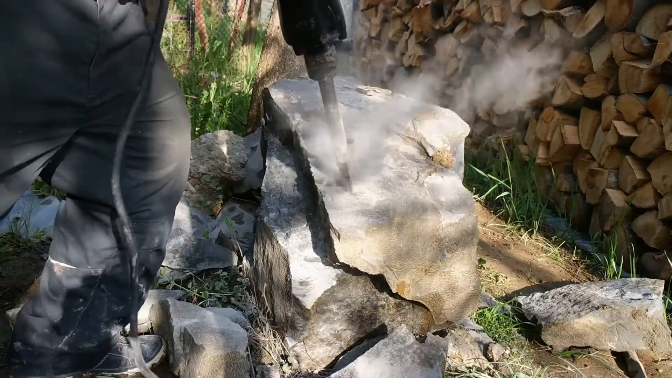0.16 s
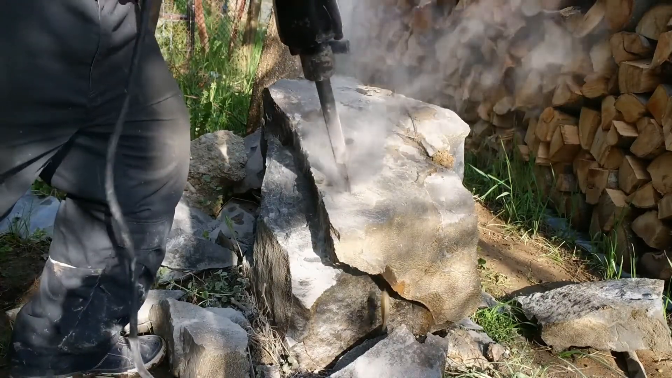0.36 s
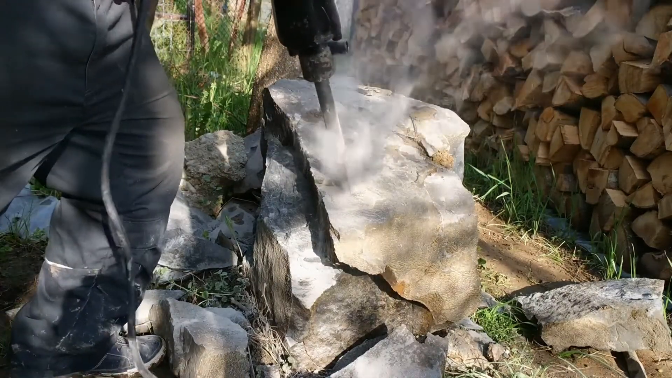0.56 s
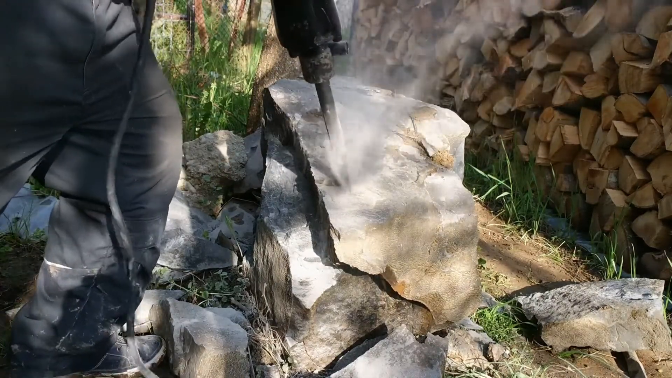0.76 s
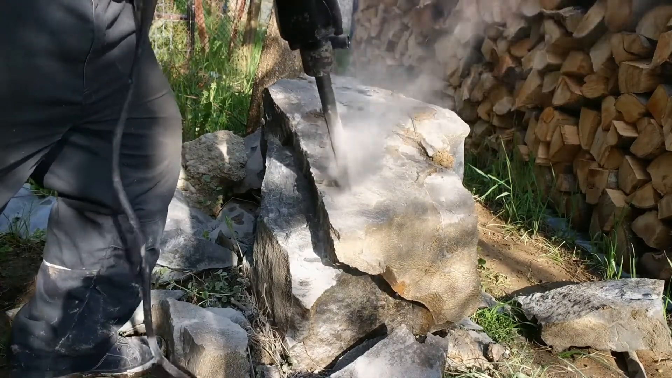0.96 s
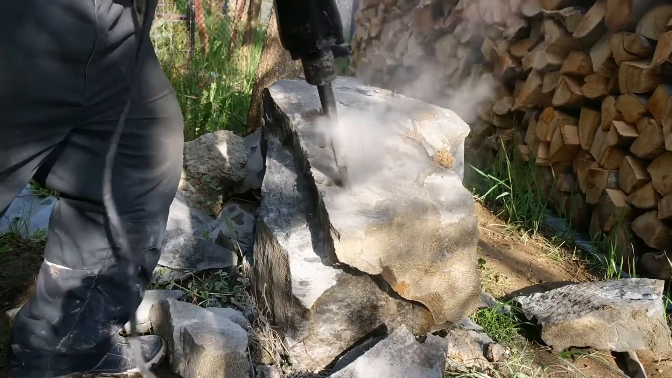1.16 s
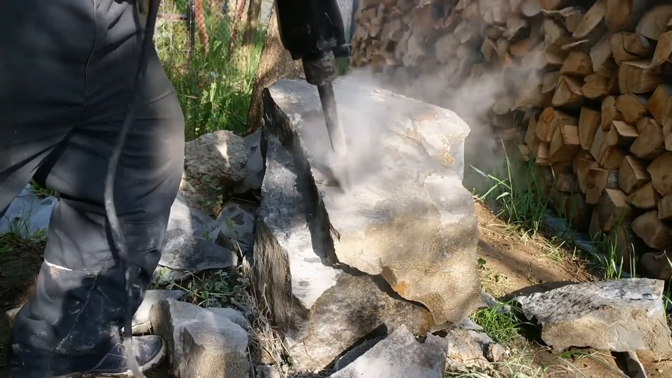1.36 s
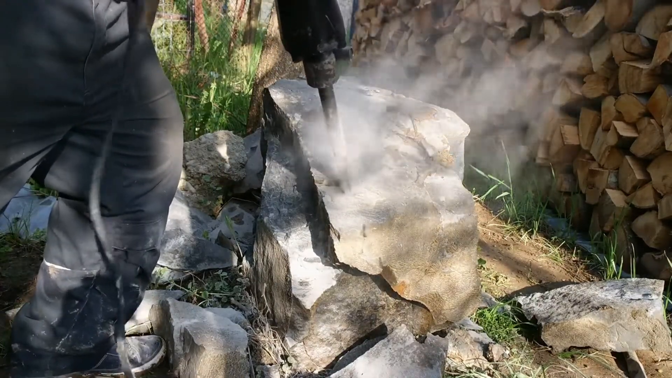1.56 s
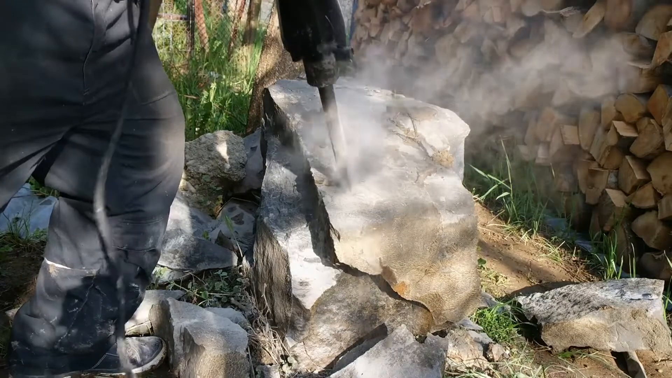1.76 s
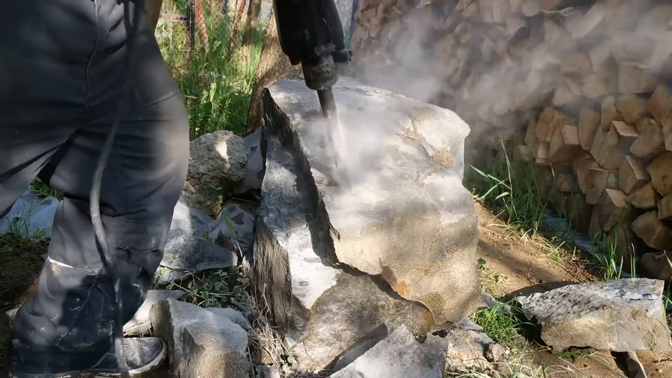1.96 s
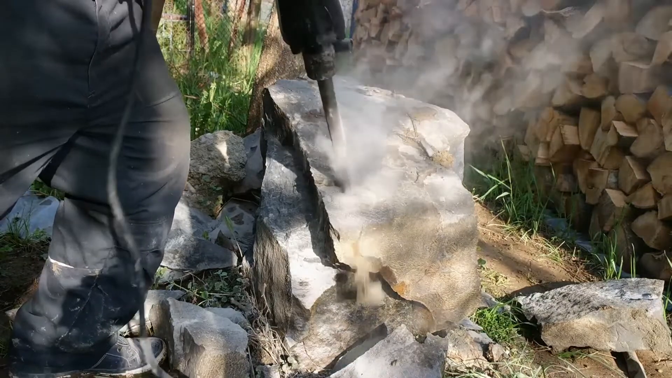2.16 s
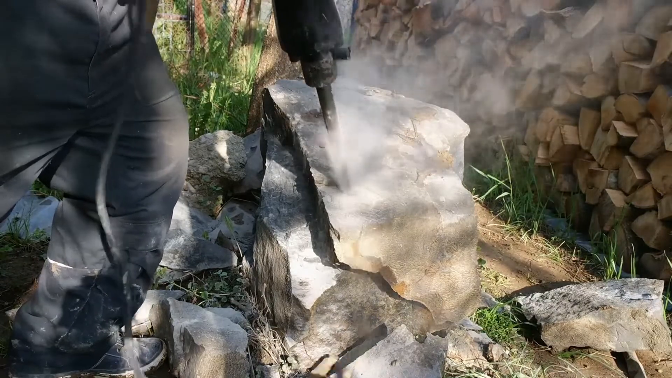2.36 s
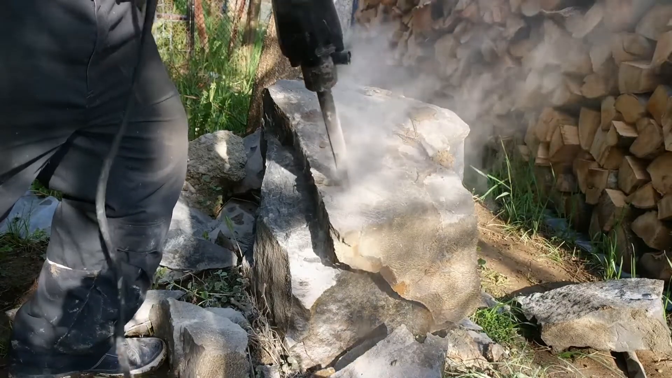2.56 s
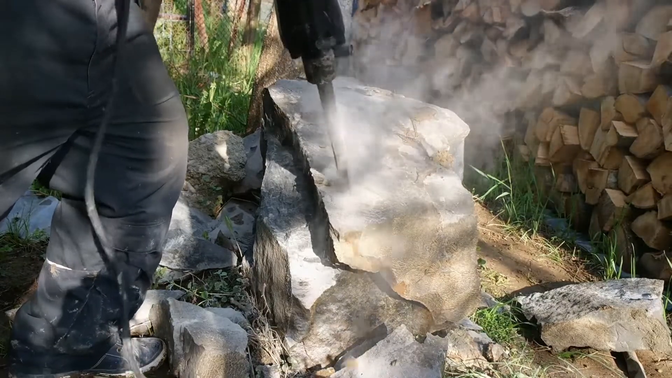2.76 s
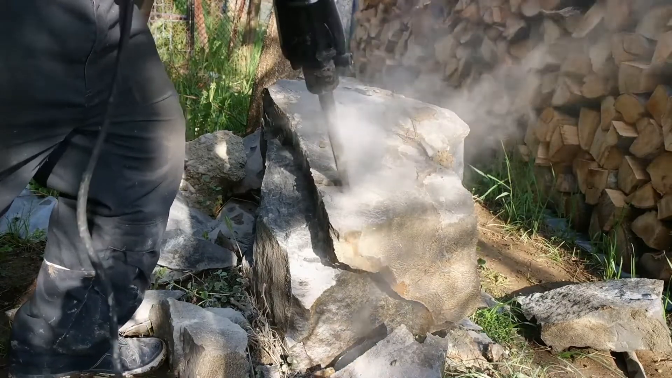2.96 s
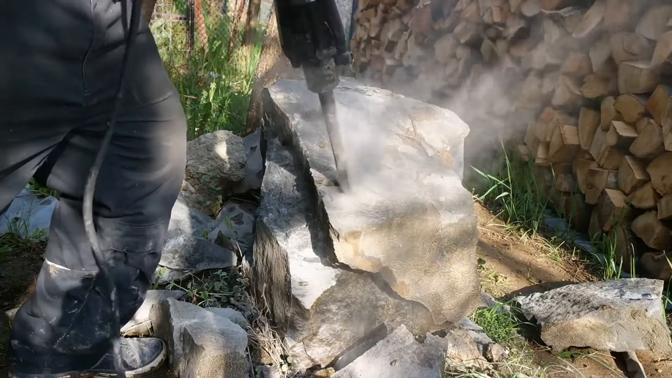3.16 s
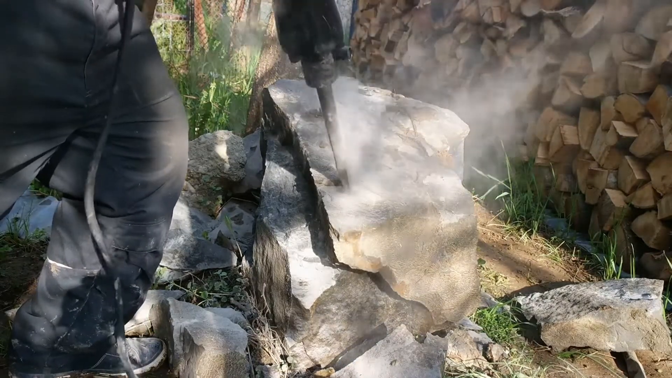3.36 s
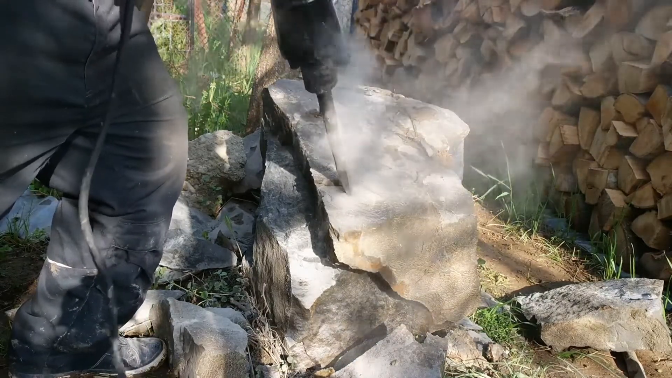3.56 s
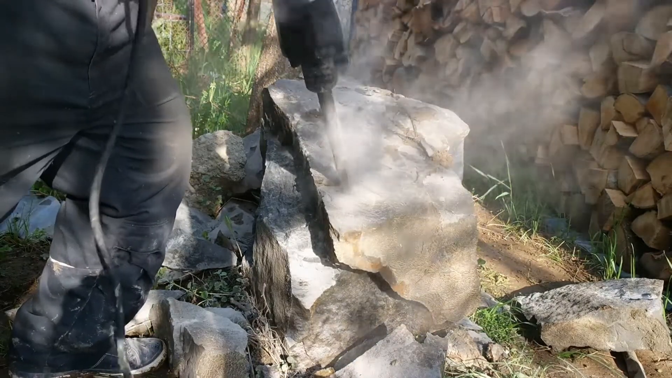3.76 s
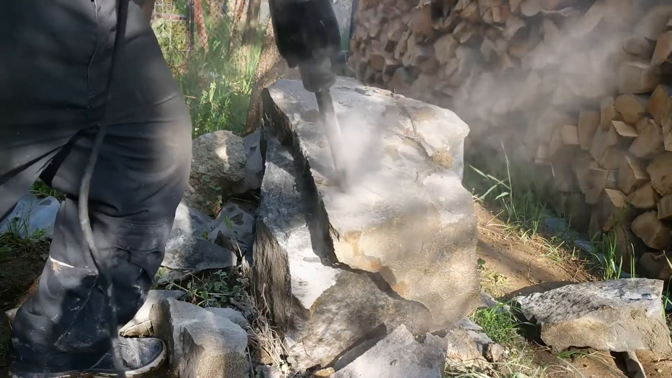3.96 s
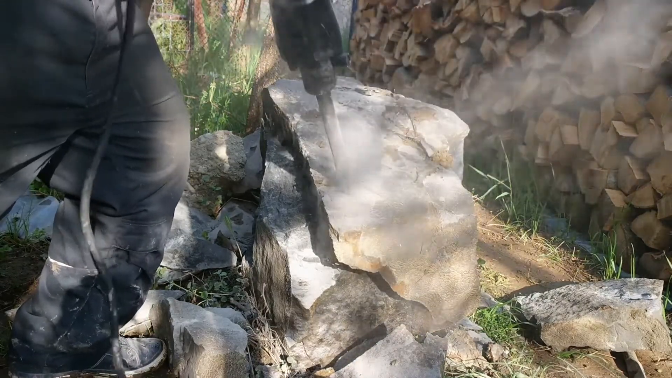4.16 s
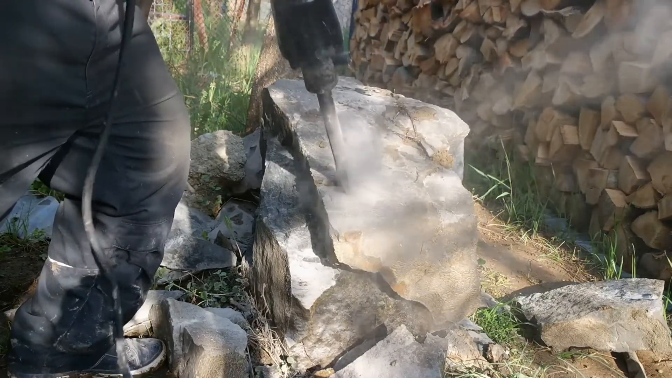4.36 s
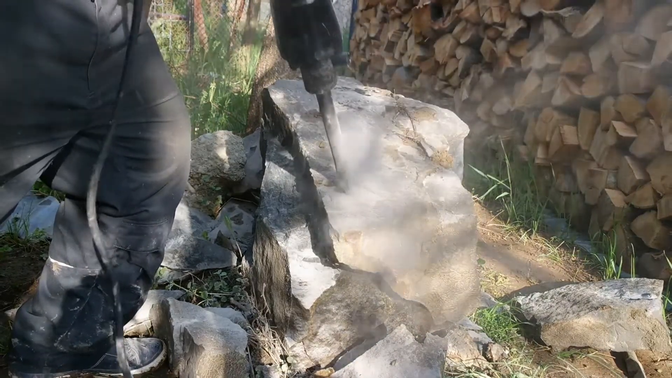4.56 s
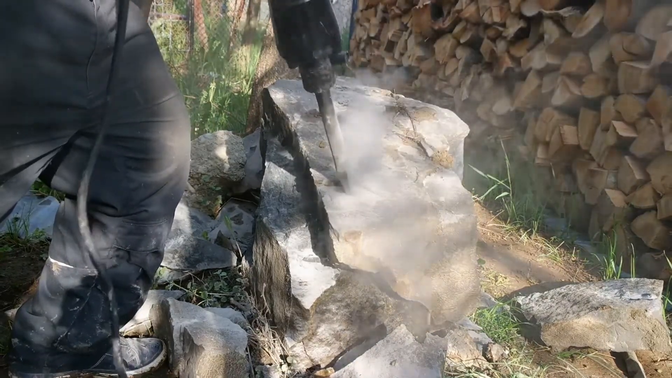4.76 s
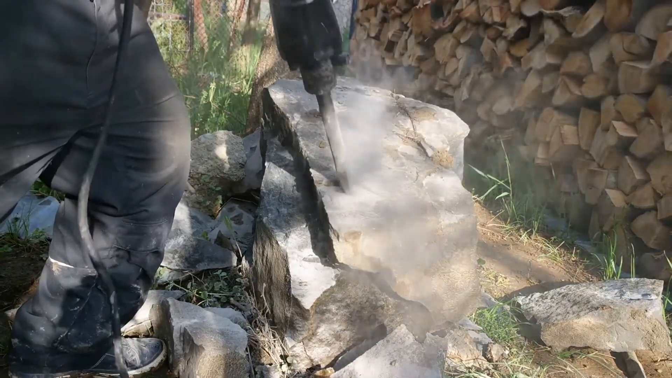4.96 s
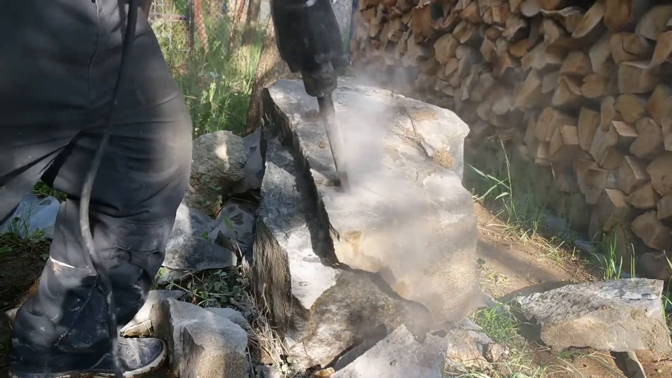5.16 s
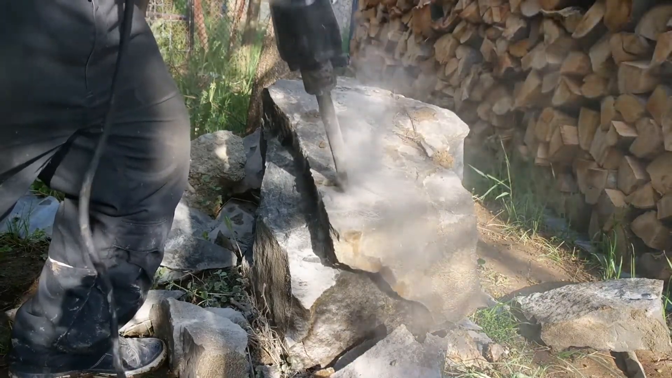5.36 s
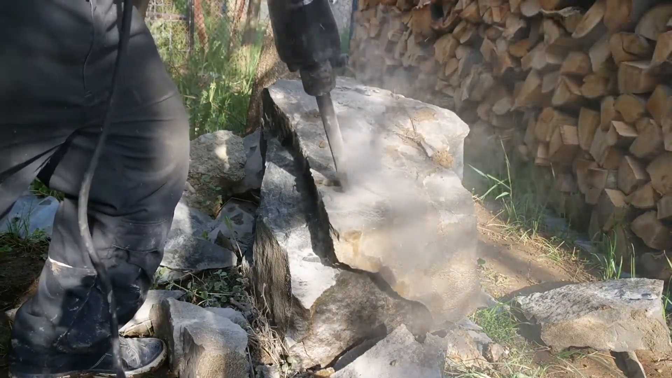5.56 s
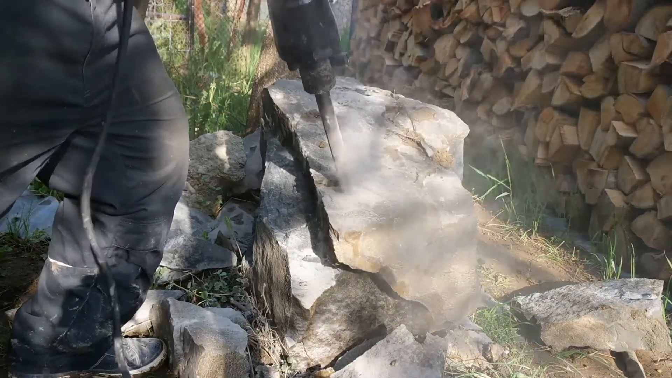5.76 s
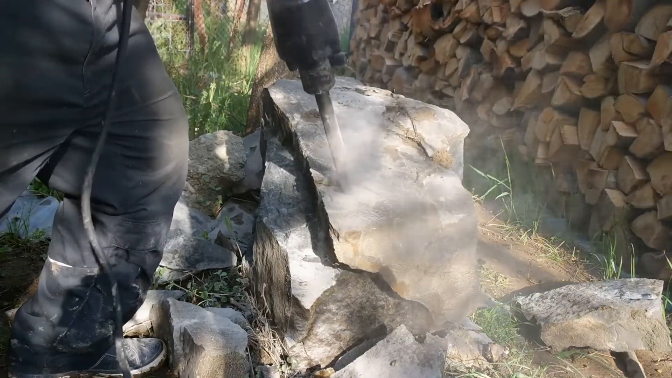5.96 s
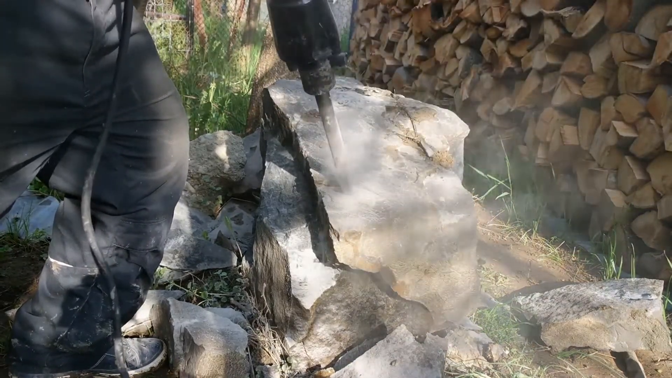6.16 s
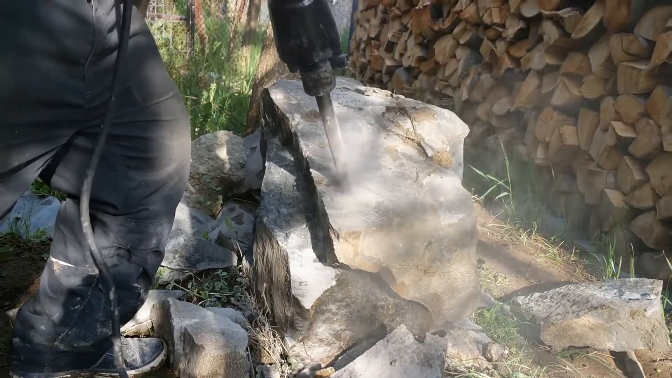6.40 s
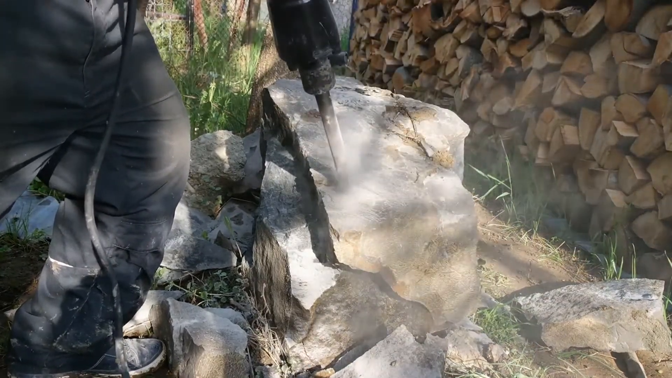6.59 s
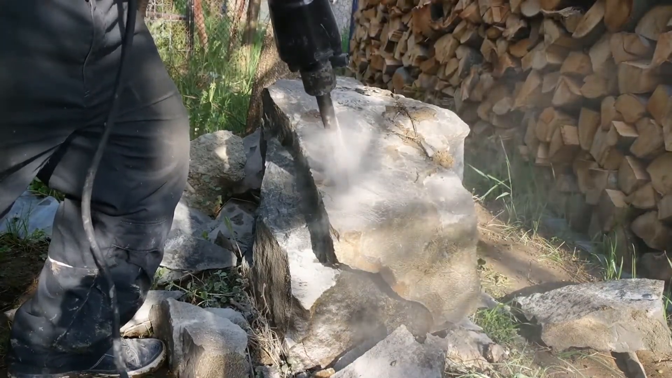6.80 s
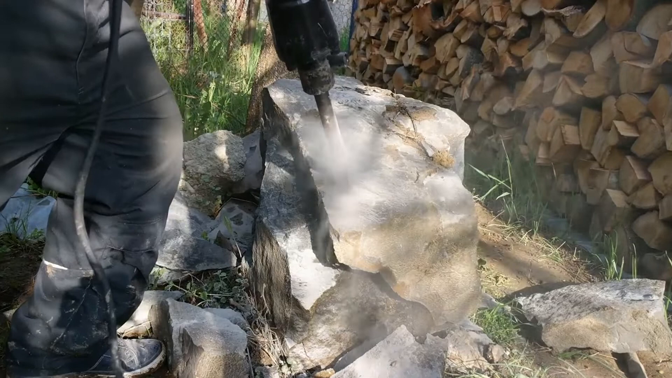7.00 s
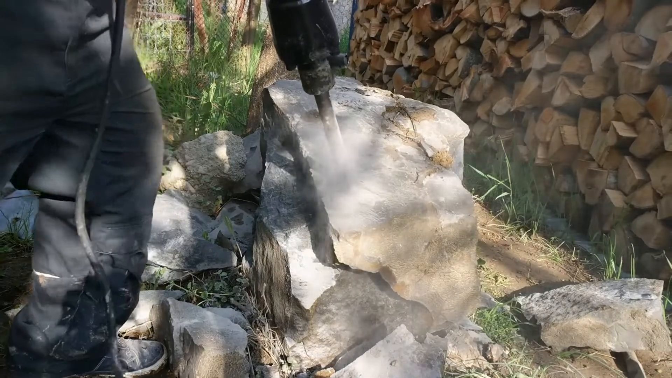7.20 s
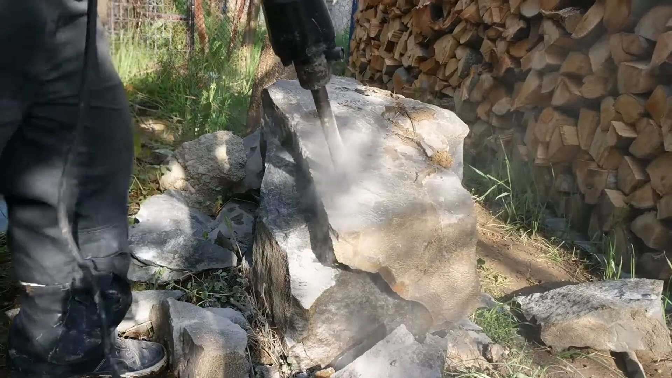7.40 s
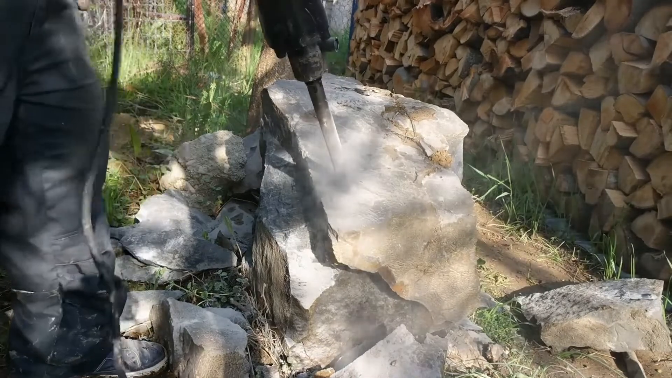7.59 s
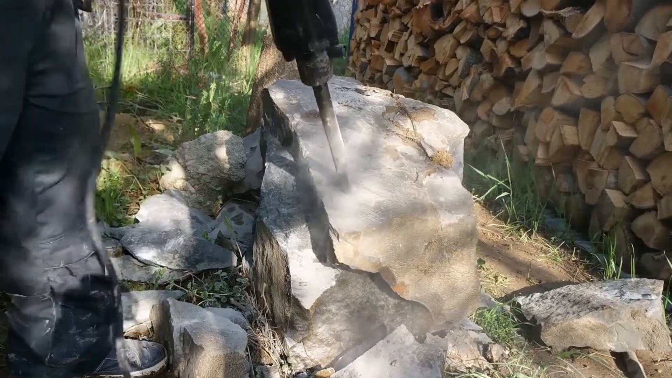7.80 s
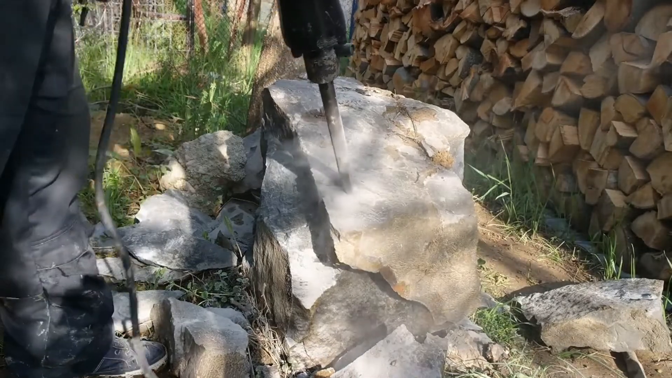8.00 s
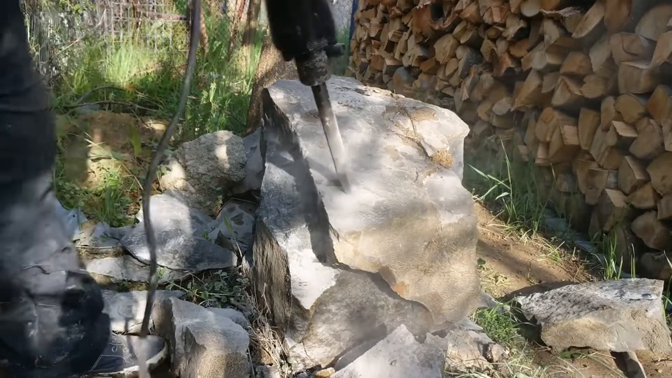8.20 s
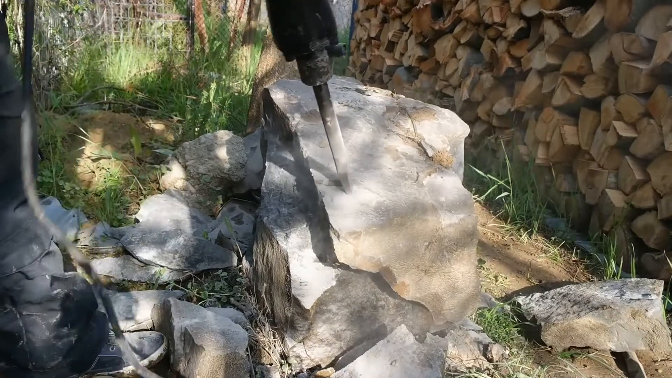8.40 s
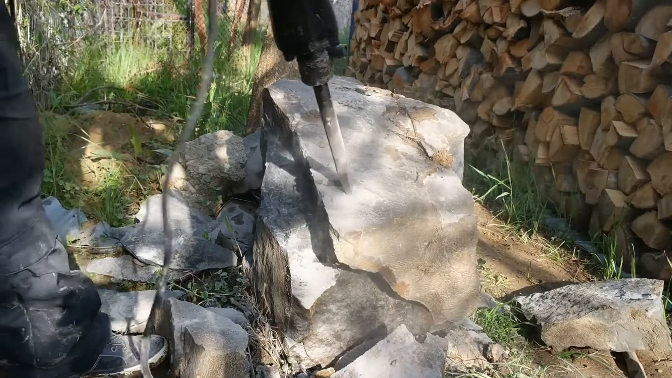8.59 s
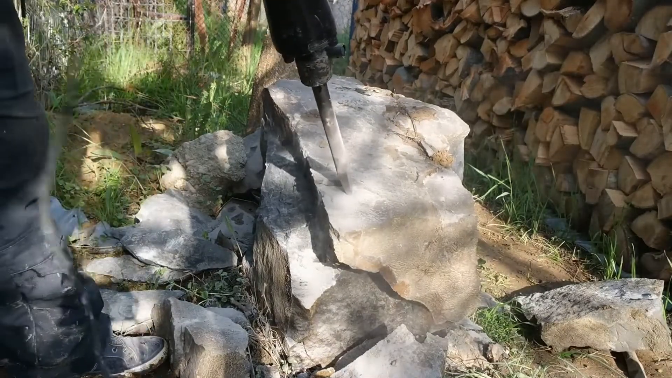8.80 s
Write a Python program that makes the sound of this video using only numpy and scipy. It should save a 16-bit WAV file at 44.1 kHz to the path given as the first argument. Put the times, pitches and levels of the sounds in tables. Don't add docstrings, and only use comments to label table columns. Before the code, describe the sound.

Close up outdoors, an electric rotary hammer is already drilling rock at full speed, about 22 blows a second. Each blow mixes a gritty crunch, a hard stone thud and bright, uneven steel ringing over constant grinding. After seven seconds it slows; the bit coasts with irregular knocks, rough scrapes and a low growl, then stops, leaving soft open air and a distant hum. The loudest peaks are squashed by the close stereo phone.

```python
import sys
import numpy as np
from scipy import signal
from scipy.fft import rfft, irfft
from scipy.io import wavfile
from scipy.ndimage import uniform_filter1d

SR = 44100
rng = np.random.default_rng(int(sys.argv[2]) if len(sys.argv) > 2 else 0)


def boost(x):
    u = np.asarray(x, float) / 20
    return 10 ** u


def materialize(psi):
    bounded = np.clip(np.atleast_2d(psi).T, -1, 1)
    quanta = np.round(bounded * 32767).astype(np.int16)
    wavfile.write(sys.argv[1], SR, quanta)


N = 389844
TIME = np.arange(N) / SR
FREQ = np.maximum(np.arange(N // 2 + 1) * SR / N, 1)


def curve(table, at=TIME, warp=np.asarray):
    x, *columns = np.transpose(table)
    return [np.interp(warp(at), warp(x), c) for c in columns]


def colour(spectrum):
    return boost(curve(spectrum, FREQ, np.log)[0])


def walk(rate_hz):
    hold = int(SR / rate_hz)
    held = np.repeat(rng.standard_normal(N // hold + 1), hold)
    slewed = uniform_filter1d(held, hold)[:N]
    return slewed / slewed.std()


def noise(gain, envelope, grain_db):
    # frequency in Hz, shared power 0-1.
    likeness = [(60, 0.63), (500, 0.93), (1400, 0.83), (3000, 0.19), (15000, 0.43)]
    grit = rng.standard_normal((3, N)) * boost(grain_db * walk(900))
    grit /= grit.std()
    like = np.clip(curve(likeness, FREQ, np.log)[0], 0, 1)
    shared, *own = rfft(grit * envelope)
    late = np.exp(-2j * np.pi * FREQ / SR)
    common = shared * np.array([late ** 0, late])
    both = np.sqrt(like) * common + np.sqrt(1 - like) * np.array(own)
    return irfft(both * gain / np.sqrt(np.mean(gain ** 2)), N)


def since(times_s):
    event = np.maximum(np.searchsorted(times_s, TIME, side="right") - 1, 0)
    return event, np.abs(TIME - times_s[event])


def ring(hz, t60_s, size, age, blow, rough, spread=0.64, detune=0.00203, rise_s=0.0022):
    bend, turn, between, pan = rng.standard_normal((len(size), 4)).T
    phase = 2 * np.pi * hz * (1 + detune * bend[blow]) * age + 3 * turn[blow]
    fade = boost(60 * (0.02 - age) / t60_s) * (1 - np.exp(-age / rise_s))
    shake = (1 + rough * (walk(190) + 1j * walk(190))) / np.sqrt(1 + 2 * rough ** 2)
    side = np.array([[1], [-1]])
    ports = size * boost(1.46 * side * pan) * np.exp(1j * side * spread * between)
    return np.imag(ports[:, blow] * (np.sqrt(2) * fade * shake * np.exp(1j * phase)))


def outdoors():
    # frequency in Hz, level in dB per Hz.
    air_colour = [(30, -31), (200, -3.5), (400, -0.5), (1300, -2.5), (2200, -11), (6000, -15.5),
                  (15600, -21)]
    # frequency in Hz, level in dB rms.
    hum_tones = [(86.1, -55), (172.3, -58), (393, -52)]
    air_db, duck_db, unduck_s = -36, -9.5, (7.6, 7.7)
    hum = 0
    for hz, db in hum_tones:
        level = boost(db + 0.74 * walk(4.7))
        hum = hum + np.sqrt(2) * level * np.sin(2 * np.pi * hz * TIME)
    air = noise(colour(air_colour), boost(air_db - 4.7 + 0.72 * walk(10)), grain_db=0.5)
    return air + hum * boost(np.interp(TIME, unduck_s, (duck_db, 0)))


def groans():
    # start in seconds, level in dB, first pitch in Hz, length in seconds.
    jams = [
        (8.084, -35, 332, .04),
        (8.162, -32, 420, 0.091),
    ]
    end_hz, sag_s = 250, 0.025
    out = 0
    for start_s, db, hz, length_s in jams:
        age = np.clip(TIME - start_s, 0, length_s)
        pitch_hz = end_hz + (hz - end_hz) * np.exp(-age / sag_s)
        swell = np.sin(np.pi * age / length_s) ** 0.5
        out = out + boost(db + 0.5) * swell * np.sin(2 * np.pi * np.cumsum(pitch_hz) / SR)
    return out


def coasting():
    # start in seconds, knock peak in dB,
    # scrape at start in dB, scrape at end in dB, growl in dB.
    fits = [(7.49, -24, -32, -24, -47), (7.5337, -14, -23, -26, -38), (7.5882, -10, -23, -21, -35),
            (7.64, -9, -21, -22.5, -42), (7.6979, -9.5, -15, -21.5, -42), (7.748, -11, -16.5, -21.5, -33),
            (7.7937, -10, -13.5, -21, -44), (7.855, 3, -19.5, -23.5, -33), (7.917, -13, -16, -23, -24.5),
            (7.989, -6.5, -18, -24.5, -27), (8.068, -1.5, -21.5, -16.5, -32), (8.131, -15, -24, -32, -32),
            (8.1636, -11, -17, -23, -27), (8.197, -16, -17, -22, -20), (8.2682, 1, -24, -26, -33),
            (8.2976, -15, -19.5, -24.5, -23.5), (8.3887, -8, -14, -42, -35), (8.4173, -19, -19, -33, -27),
            (8.461, -27, -28, -43, -30), (8.53, -34, -44, -57, -37), (8.61, -26.5, -55, -55, -49),
            (8.6743, -37, -58, -52, -45)]
    # time in seconds, pitch in Hz.
    slips = [
        (7.534, 700),
        (7.64, 596),
        (7.748, 560),
        (7.794, 489),
        (7.989, 400),
        (8.197, 655),
        (8.461, 614),
        (8.61, 370),
        (8.675, 377),
    ]
    # frequency in Hz, level in dB per Hz.
    scrape_colour = [(150, -35), (400, -9), (900, -9), (1300, -10.5), (1700, -2.5), (2250, -5),
                     (3800, -0.5), (4600, -8), (5300, -6.5), (8000, -13), (11500, -20), (15600, -31)]
    hole_hz = 432
    let_go_s, let_go_db = 0.0093, -1.5

    s, peak_db, start_db, end_db, growl_db = np.transpose(fits)
    slip_s, slip_hz = np.transpose(slips)
    first_hz = np.full(len(s), float(hole_hz))
    first_hz[np.abs(s[:, None] - slip_s).argmin(axis=0)] = slip_hz
    fit, age = since(s)
    on = TIME >= s[0]
    length_s = np.diff(np.append(s, N / SR))[fit]

    scrape_db = start_db[fit] + age / length_s * (end_db - start_db)[fit]
    scrape_db = scrape_db + let_go_db * np.clip(1 - (length_s - age) / let_go_s, 0, 1)
    scrape = noise(colour(scrape_colour), on * boost(scrape_db + 1.0 + 1.65 * walk(110)), grain_db=1.5)

    snap = on * boost(peak_db[fit]) * np.exp(-age / 0.0015)
    crack = noise(colour(scrape_colour) * FREQ ** 0.35, snap, grain_db=-0.5)
    crack = 0.75 * crack.sum(axis=0) - 0.4 * crack[::-1]
    thud = ring(1055, 0.06, boost(3 * peak_db - 42) * (s < 8), age, fit, 0.2, spread=0.2)

    settle = np.maximum(age / 0.0344, 1e-6)
    sag_hz = hole_hz + (first_hz[fit] - hole_hz) * (1 - np.exp(-settle)) / settle
    growl = ring(sag_hz, 0.41, boost(growl_db - 5.5), age, fit, 0.5, spread=0.079, rise_s=0.0034)
    squeal = ring(1750 - 1800 * age, 0.8, boost(start_db - 14.5), age, fit, 0.9, detune=0.048)
    return scrape + crack + on * (growl + squeal + thud) + groans()


def blows():
    # time in seconds, strokes done.
    crank = [(-.017, 0), (.385, 9), (.822, 19), (1.166, 27), (1.758, 40), (1.976, 45), (3.107, 70),
             (3.409, 77), (3.592, 81), (3.896, 88), (4.692, 106), (5.405, 122), (5.713, 129), (6.987, 158),
             (7.166, 162)]
    # time in seconds, grip 0-1, crush in dB,
    # muffling of the steel by dust in dB.
    bite = [(0, 0.1, -22.5, 0.8), (1.1, 0.03, -20.5, .1), (3.55, 0, -21, 1), (3.7, 0.17, -21, 2),
            (4.5, 0.19, -20.5, 2), (5.3, 0.51, -19.5, 2.5), (5.45, 0.2, -20, 1.5), (5.75, 0.12, -22.5, 1),
            (5.93, 0.96, -20.5, 0), (7.2, 0.87, -19.5, -1.2)]
    # time in seconds, damping in dB.
    dull_blows = [(-.017, 6), (.164, 3), (.432, 8), (.693, 2.5), (0.781, 11), (0.954, 5), (1.259, 1),
                  (1.716, 6), (1.848, 3), (2.068, 10), (2.572, 5), (2.661, 12), (2.751, 3), (2.973, 2),
                  (3.195, 16), (3.638, 16), (3.68, 3), (3.983, 2), (4.031, 5), (4.121, 11), (4.297, 11),
                  (4.517, 5), (4.563, 12), (4.605, 6), (5.006, 5), (5.094, 5), (5.273, -1), (5.58, 2),
                  (5.63, 23), (5.934, 2)]
    # time in seconds, singing mode in dB,
    # lift of the other modes in dB.
    singing_blows = [(.027, -14, 4), (.073, -13.5, 1.5), (0.12, -19, -1), (.515, -7, 3.5),
                     (0.824, -12.5, 0), (1.04, -14, 1.5), (1.166, -9, -2), (1.349, -7, 1),
                     (1.621, -15, -3.5), (1.976, -15, 3.5), (2.021, -12, 4.5), (2.244, -4.5, 3),
                     (2.291, -8, 6), (2.43, -20, 2), (2.519, -8.5, 1.5), (2.836, -11, .1), (2.927, -8.5, 2),
                     (3.019, -11, -4.5), (3.106, -0.5, 4), (3.282, -15, 0), (3.407, -13, 4),
                     (3.501, -12, -1), (3.544, -9, 3), (4.206, -16, 3), (4.338, -15, 3), (5.181, -20, 6.5),
                     (5.404, -17, 5), (5.492, -16, 1.5), (5.537, -11, 5.5), (5.756, -17, 0)]
    # time in seconds, crush in dB,
    # ring of middle modes in dB, ring of top modes in dB.
    run_down = [
        (7.216, -21, -12, -35),
        (7.266, -19.5, -18, -15),
        (7.324, -22.5, -14, -25),
        (7.383, -20.5, -15, -19),
        (7.455, -20, -22, -19),
    ]
    free_db, gripped_db, scatter_db = (-19, -15.5, -14), (-32, -16, -20.5), (6, 4, 1.5)
    jitter_free_s, jitter_gripped_s = 0.001, 0.0006

    when_s, strokes = np.transpose(crank)
    s = np.interp(np.arange(strokes[-1] + 1), strokes, when_s)
    chance = rng.standard_normal((len(s), 5)).T

    def nearest(rows):
        return np.abs(s[:, None] - np.transpose(rows)[0]).argmin(axis=0)

    dull, singing = nearest(dull_blows), nearest(singing_blows)
    grip, crush_db, muffle_db = curve(bite, s)
    usual_db = np.outer(free_db, 1 - grip) + np.outer(gripped_db, grip) - muffle_db
    ring_db = usual_db + chance[2:] * np.array(scatter_db)[:, None]
    s = s + (jitter_free_s + grip * (jitter_gripped_s - jitter_free_s)) * chance[0]
    s[dull], damping_db = np.transpose(dull_blows)
    ring_db[:, dull] = usual_db[:, dull] - damping_db
    s[singing], ring_db[0, singing], lift_db = np.transpose(singing_blows)
    ring_db[1:, singing] = usual_db[1:, singing] + lift_db
    driven = np.vstack([s, crush_db + 1.08 * chance[1], ring_db])
    last = np.insert(run_down, 2, gripped_db[0] - 6, axis=1).T
    return np.hstack([driven, last])


def steel_bit(s, ring_db, blow, age, deep, t60_s):
    # frequency in Hz, family (0 singing, 1 middle, 2 top).
    bit_modes = [(7330, 0), (3343, 1), (3890, 1), (5165, 1), (5370, 1), (5685, 1), (5810, 1), (7620, 1),
                 (7840, 1), (7975, 1), (10615, 2), (12470, 2), (13415, 2), (13755, 2), (14860, 2)]
    # share in dB shallow, share in dB deep in the hole, roughness 0-1.
    bit_share = [(0, 0, 0.14), (-37, -6, .7), (-6.5, -22, 1), (-14, 7, 1), (-29, -1, 0.7), (-4, -6, .7),
                 (-3, -20, 1), (-13, -4, 1), (-11, 2, .9), (0.5, -9.5, .9), (-2.5, -0.5, 0.8),
                 (-10, -6, .9), (-1.5, 2, .8), (-1, -11, 0.7), (-0.5, -1.5, 0.3)]
    touch_s, touch_db = 0.03, -0.5

    bit_hz, family = np.transpose(bit_modes)
    family = family.astype(int)
    shallow_db, deep_db, roughness = np.transpose(bit_share)
    loose = (0.0013 + 0.00894 * deep)[blow]
    share_db = np.outer(1 - deep, shallow_db) + np.outer(deep, deep_db)
    share = boost(share_db + 3.25 * rng.standard_normal((len(s), len(bit_hz))))
    share /= np.sqrt(share ** 2 @ (family[:, None] == family))
    pressed = (family > 0) & (bit_hz != 13755)
    sharp = 1 + 0.00247 * rng.exponential(size=share.shape) * pressed
    steel = 0
    for k, rough in enumerate(roughness):
        size = share[:, k] * boost(ring_db[family[k]] - 3.8 * deep)
        rise_s = 0.0012 if family[k] else 0.004
        steel = steel + ring(bit_hz[k] * sharp[blow, k], t60_s, size, age, blow, rough,
                             detune=loose, rise_s=rise_s)
    return steel * boost(touch_db * np.clip((age - touch_s) / 0.004, 0, 1))


def struck_stone(crush_db, blow, age):
    # frequency in Hz, level in dB against the crush, T60 in seconds.
    stone_modes = [(428, -24, 0.099), (719, -23, 0.072), (1036.5, -12.5, 0.1), (1242, -16, 0.065),
                   (1609, -15.5, 0.069)]
    # frequency in Hz, spread as a share, level in dB against the crush, T60 in seconds.
    flake_modes = [(2900, .09, -21, .05), (4850, .06, -19, .055), (8150, .035, -22, .04)]
    out = 0
    for hz, db, t60_s in stone_modes:
        size = boost(crush_db + db + 0.95 * rng.standard_normal(len(crush_db)))
        out = out + ring(hz, t60_s, size, age, blow, 0.46, spread=0.66, detune=0.02, rise_s=0.00041)
    for hz, wide, db, t60_s in flake_modes:
        size = boost(crush_db + db + 2.5 * rng.standard_normal(len(crush_db)))
        out = out + ring(hz, t60_s, size, age, blow, 1.0, detune=wide, rise_s=0.00026)
    return out


def hammer():
    # frequency in Hz, level in dB per Hz.
    crush_colour = [(30, -26), (200, -13), (430, -2), (930, 1), (1200, 2.5), (2250, 2.5), (2900, 7),
                    (5200, 6), (7900, 3), (9500, 0), (11500, -1.5), (14400, -1.5), (15600, -3)]
    # time in seconds, grind in dB.
    grind_curve = [(0, -20), (3, -19.5), (5.7, -20), (7.15, -20.5), (7.32, -25), (7.5, -31)]
    sink_s, t60_shallow_s, t60_deep_s = (3.4, 6.77), 0.29, 0.15

    s, crush_db, *ring_db = blows()
    blow, age = since(s)
    deep = np.clip((s - sink_s[0]) / (sink_s[1] - sink_s[0]), 0, 1)
    t60_s = (t60_shallow_s + deep * (t60_deep_s - t60_shallow_s))[blow]

    burst = boost(crush_db[blow] + 12.0) * (np.exp(-age / 0.02) + 0.59 * np.exp(-age / 0.0027))
    grind = boost(curve(grind_curve)[0] + 5.5 + 1.26 * walk(30)) * (TIME < grind_curve[-1][0])
    crush = noise(colour(crush_colour), np.hypot(burst, grind), grain_db=1.0)

    free_db = (ring_db[1] + ring_db[2]) / 2
    rattle_fade = np.exp(-age / t60_s * 6) + 0.73 * np.exp(-age / 0.0047)
    rattle_level = boost(-12.5 + 0.71 * (free_db[blow] + 20.5)) * rattle_fade
    bright = colour(crush_colour) * FREQ ** 2 / (FREQ ** 2 + 6100.0 ** 2)
    rattle = noise(bright, rattle_level, grain_db=3.0)

    steel = steel_bit(s, ring_db, blow, age, deep, t60_s)
    return steel + struck_stone(crush_db, blow, age) + crush + rattle


def scene():
    near = hammer() + coasting()
    echo_age = np.arange(6000) / SR
    scatter = rng.standard_normal((2, 6000)) * np.exp(-echo_age / 0.039)
    echo = signal.fftconvolve(near, scatter, axes=1)[:, :N]
    return near + boost(-46.5) * echo + outdoors()


def roll_off(x):
    return signal.sosfilt(signal.butter(12, 15520, fs=SR, output="sos"), x)


def record(dry):
    squashed = dry / (1 + np.abs(dry / 0.92) ** 4) ** 0.25
    return roll_off(squashed)


dry = scene()
out = record(dry)
materialize(out)
```